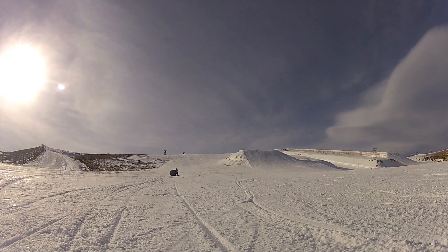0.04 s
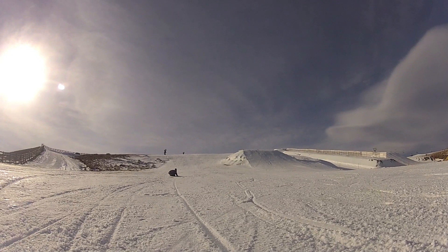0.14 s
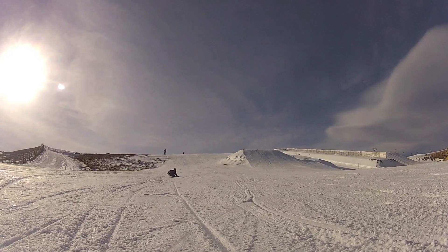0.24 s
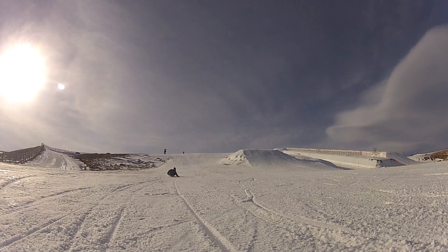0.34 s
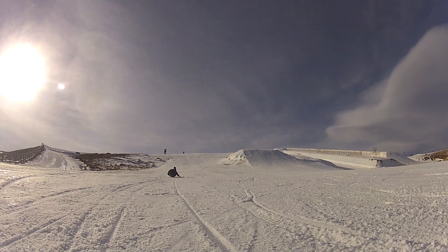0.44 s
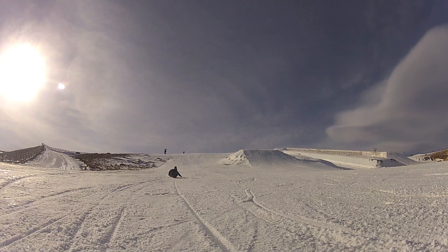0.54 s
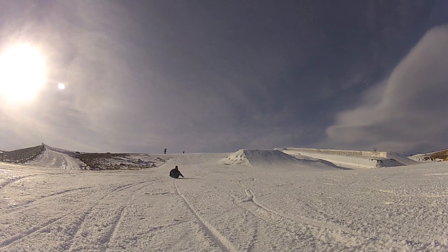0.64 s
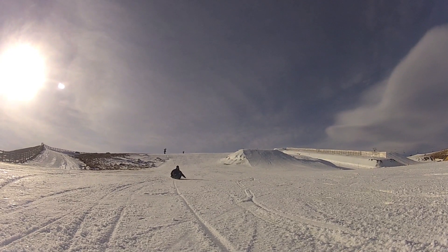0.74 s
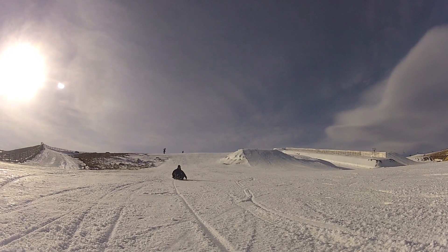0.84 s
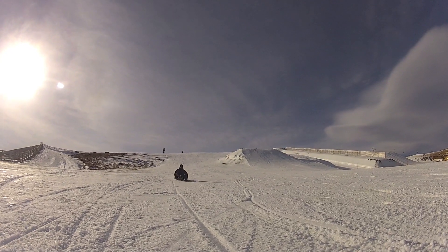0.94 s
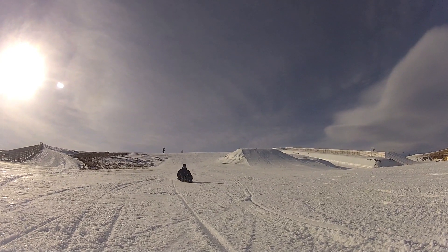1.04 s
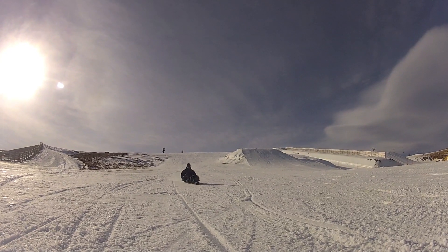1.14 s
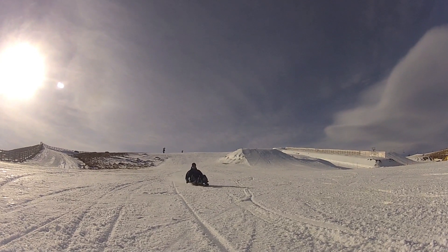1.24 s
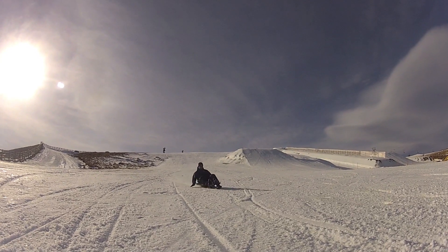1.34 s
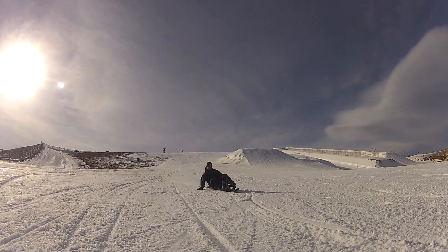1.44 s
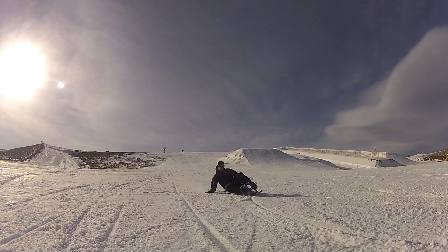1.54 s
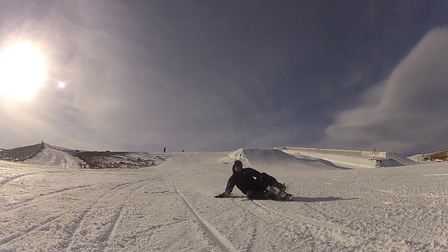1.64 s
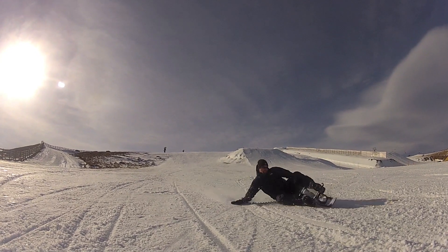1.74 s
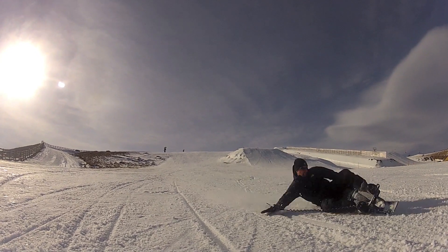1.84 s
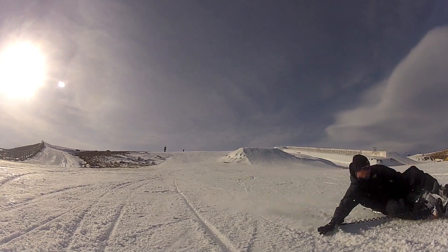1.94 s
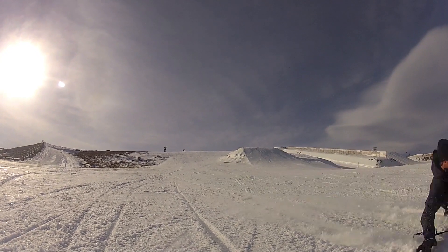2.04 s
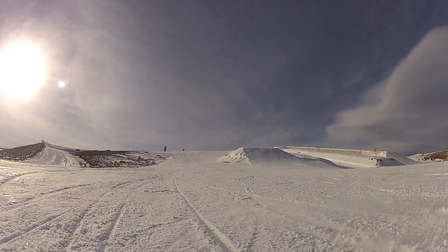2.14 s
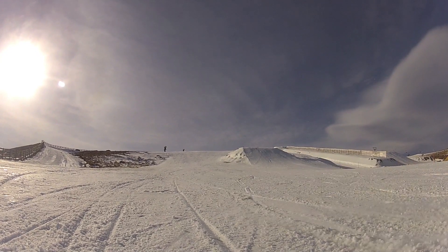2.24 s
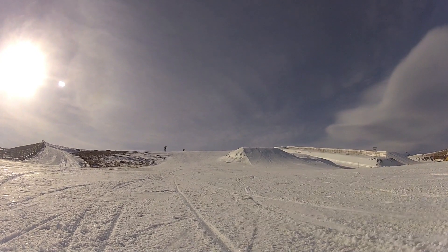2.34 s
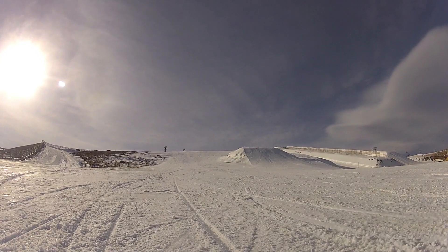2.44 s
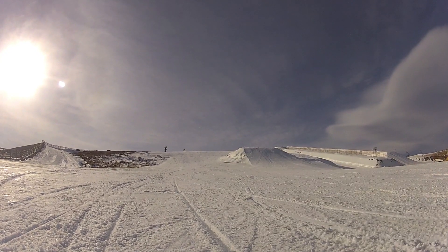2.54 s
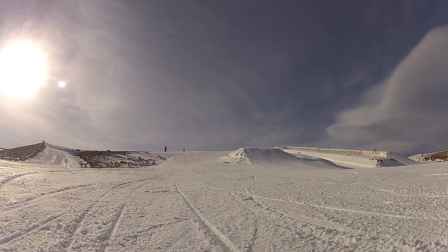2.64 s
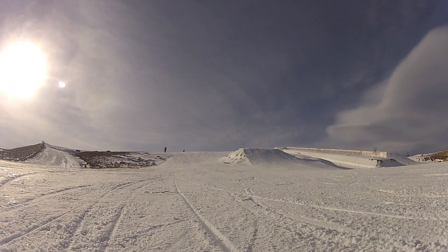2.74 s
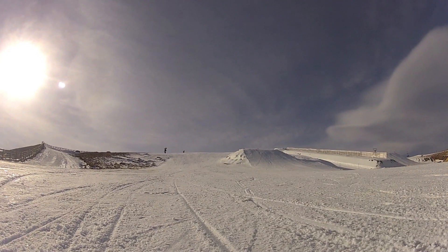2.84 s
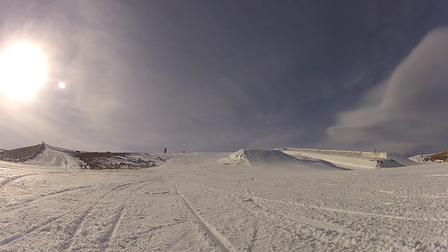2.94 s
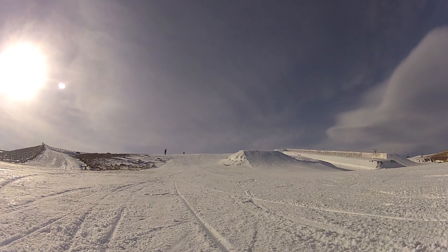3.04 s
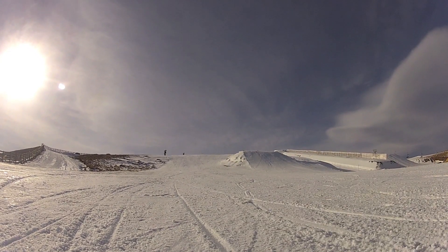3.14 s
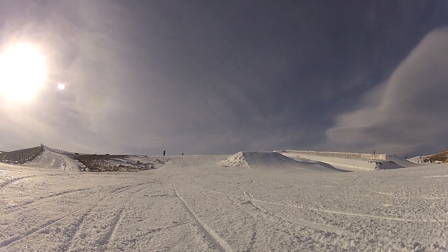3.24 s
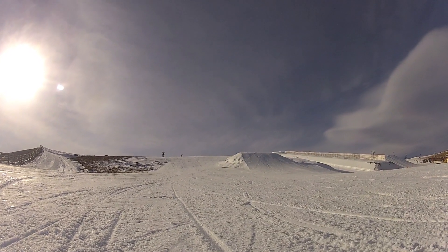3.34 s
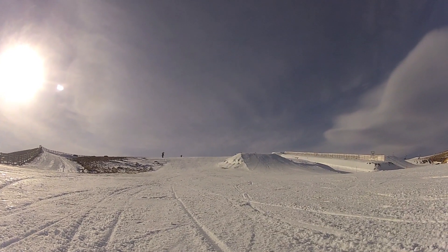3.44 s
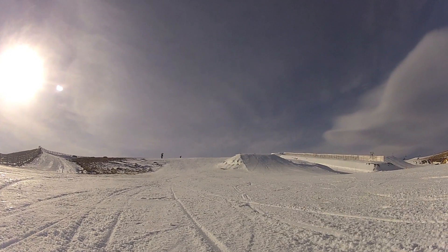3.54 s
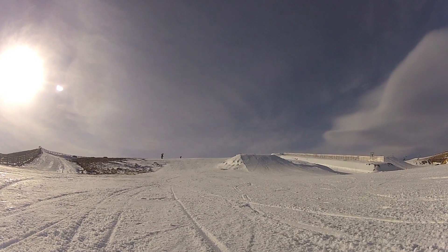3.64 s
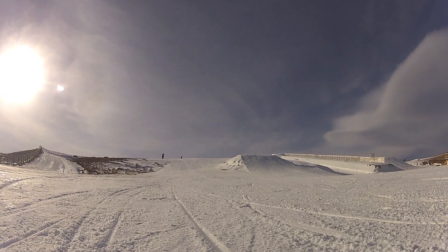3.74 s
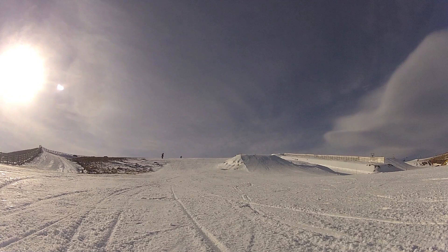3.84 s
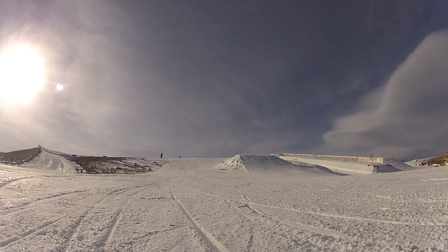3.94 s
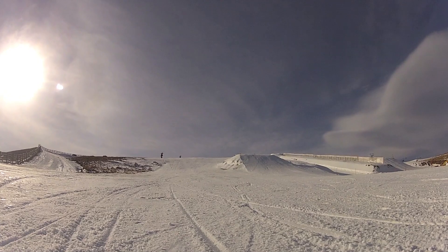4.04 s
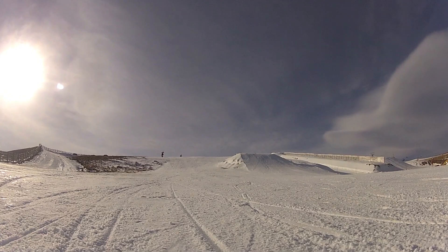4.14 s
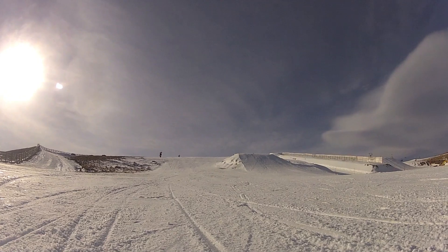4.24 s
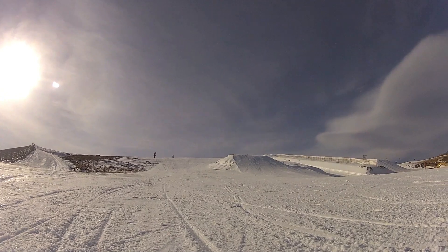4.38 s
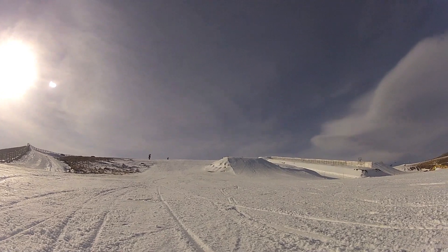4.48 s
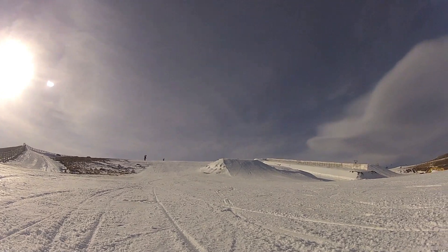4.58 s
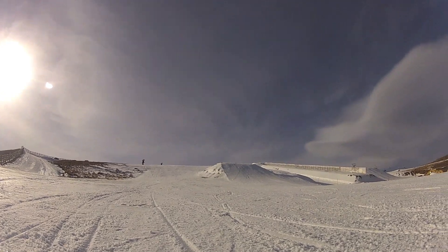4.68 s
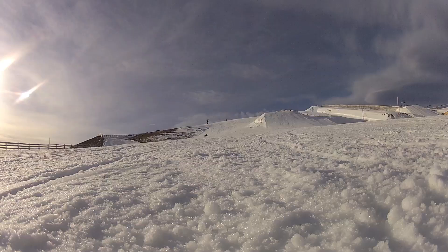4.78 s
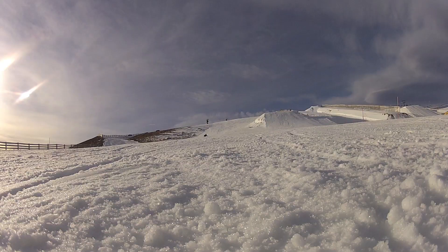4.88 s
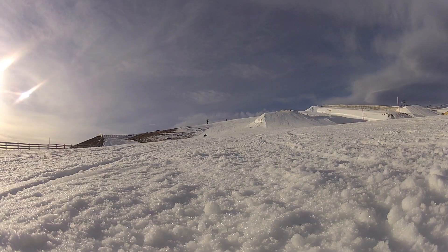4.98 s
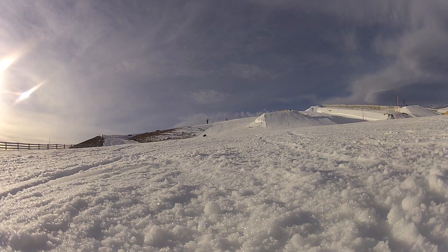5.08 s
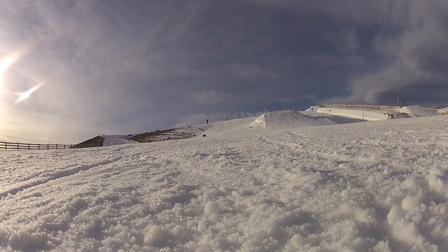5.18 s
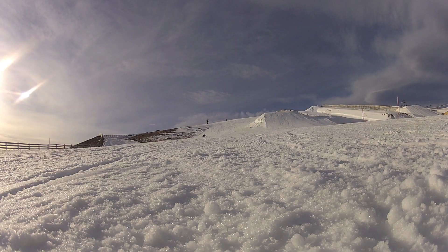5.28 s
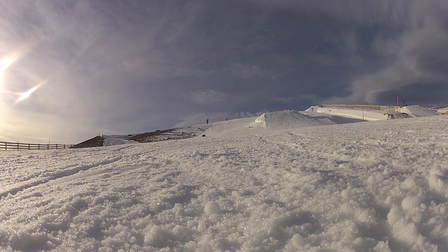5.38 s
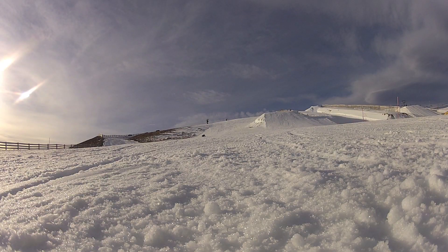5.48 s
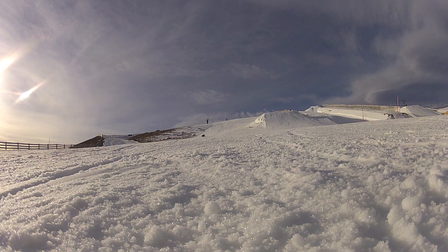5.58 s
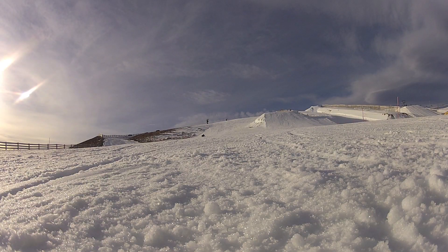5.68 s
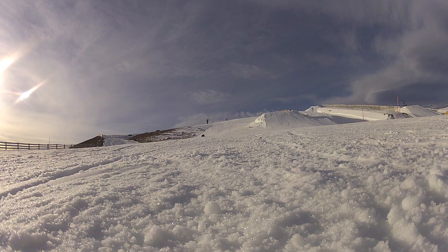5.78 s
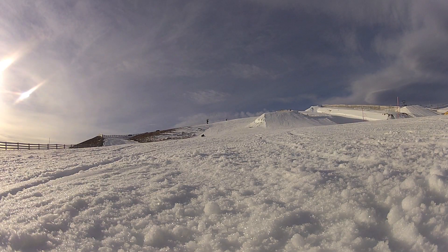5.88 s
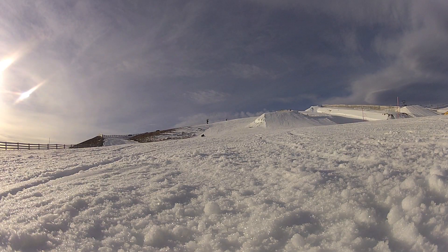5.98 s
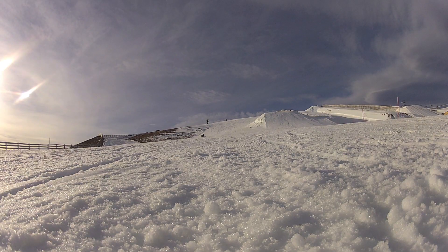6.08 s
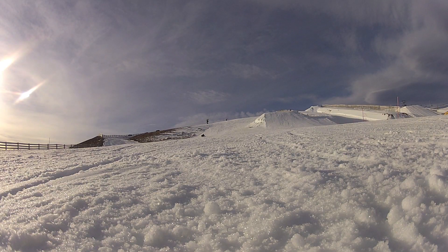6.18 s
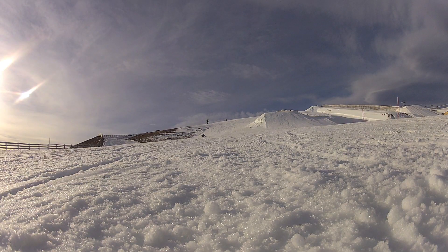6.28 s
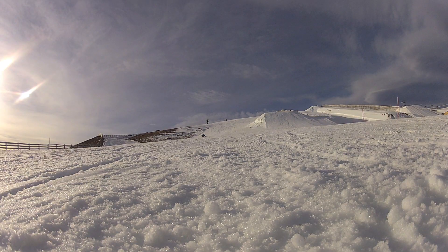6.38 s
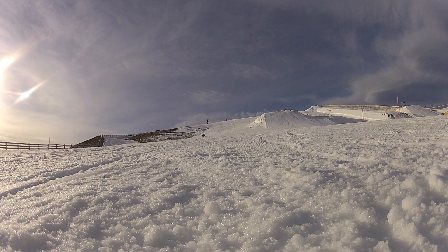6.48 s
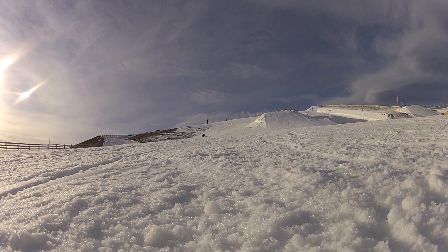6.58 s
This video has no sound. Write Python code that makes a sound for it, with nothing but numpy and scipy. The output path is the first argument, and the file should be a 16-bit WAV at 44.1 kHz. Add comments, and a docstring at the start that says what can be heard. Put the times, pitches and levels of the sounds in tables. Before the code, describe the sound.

A sled swishes by over snow and fades, then the camera tips over with a brief crunch and a sharp knock.

```python
"""Sled pass and camera tumble

A sled scrapes down packed snow, passes close to a cased camera lying on the slope and sprays it with
crumbs that ping on the case. Light wind rumbles underneath. The camera then tips over in the crunching
snow and lands with a hard knock that overloads the microphone, so the recorder ducks for a moment."""
import sys
import numpy as np
from scipy import signal
from scipy.fft import rfft, irfft
from scipy.io import wavfile
from scipy.ndimage import uniform_filter1d

SR = 44100
rng = np.random.default_rng(int(sys.argv[2]) if len(sys.argv) > 2 else 0)


def file_out(sig):
    """Save sig as 16-bit WAV at sys.argv[1]."""
    # one column per channel
    cols = np.atleast_2d(sig).T
    # limit, then scale
    lim = np.clip(cols, -1, 1)
    pcm = np.round(lim * 32767).astype(np.int16)
    wavfile.write(sys.argv[1], SR, pcm)


N = 291711
TIME = np.arange(N) / SR
FREQS = np.fft.rfftfreq(8192, 1 / SR) + 1e-3

# Wind on the case. Each row: time in seconds, level in dB.
WIND_LEVEL = [(0, -52), (.8, -55), (2.8, -54.5), (4, -58.5), (4.95, -63.5), (5.6, -62), (6.6, -65)]
# Tone of the wind and of the microphone's hiss. Each row: frequency in Hz, gain in dB.
WIND_EQ = [(15, -8), (28, -2.5), (50, -1), (105, 1.5), (170, -2.5), (290, -4), (370, -15), (480, -22.5),
           (800, -29), (2000, -46)]
HISS_EQ = [(100, 5.5), (380, 12.5), (500, 9), (700, 4), (1200, 1), (2200, -1), (4800, -6), (5600, -11.5),
           (6030, -16), (6500, -12), (7300, -9), (11000, -16), (13000, -17.5), (15000, -17)]
# Where the sled is. Each row: time in seconds, bearing (0 ahead, 1 alongside, 2 behind).
SLED_BEARING = [(0, 0), (1.35, 0.16), (1.6, 0.51), (1.8, 0.68), (2.0, 1.07), (2.22, 1.76), (2.36, 2)]
# Case resonances for sound from each bearing. Each row: centre in Hz, width in Hz, gain in dB.
AHEAD_MODES = [(654, 460, -6.5), (1380, 126, -4.5), (2016, 245, 1.5), (2600, 420, -5), (3060, 120, 0.5),
               (3740, 230, 3.5), (4150, 330, -4), (4910, 500, -12), (5350, 470, -4), (6600, 850, -6.5),
               (7830, 410, -12), (8230, 216, -3), (8920, 200, -10), (9750, 500, -16), (12200, 550, -21),
               (14400, 400, -16), (14960, 340, -19.5)]
ALONGSIDE_MODES = [(670, 410, -5.5), (1346, 170, -4), (1824, 240, 3), (2270, 270, -10), (3160, 290, -4.5),
                   (3630, 430, -5.5), (4540, 470, -13.5), (5040, 480, -20), (7000, 650, -13.5),
                   (8140, 500, -11.5), (8410, 380, -10), (8900, 260, -14), (10210, 370, -16),
                   (13700, 400, -16), (14500, 330, -11.5), (15200, 250, -25)]
BEHIND_MODES = [(450.1, 310, -1.5), (950, 350, -2.5), (1958, 120, -2.5), (2360, 220, -5.5),
                (3200, 330, -6.5), (3726, 190, -1), (5100, 300, -16.5), (6940, 260, -17), (8330, 260, -7),
                (9610, 200, -15), (10000, 260, -18), (10830, 200, -21.5), (12900, 310, -21.5),
                (14000, 260, -18.5), (14450, 250, -14.5)]
# The runners bite sideways. Each row: start and release in seconds, close-up level in dB.
RUNNER_CARVES = [(-.1, .52, -43), (.45, .76, -48), (.95, 1.1, -46.5), (1.35, 2.44, -44),
                 (2.58, 2.79, -51.5)]
# Resonances that glide during the pass. Each row: first and last pitch in Hz, width in Hz, gain in dB.
GLIDING_MODES = [(2132, 2540, 250, -4.5), (3960, 3400, 260, -7.5), (4540, 5400, 280, -15.5),
                 (10030, 9450, 290, -14.5)]
# Tone of the drumming hull. Each row: frequency in Hz, gain in dB.
HULL_EQ = [(25, -41), (60, -19.5), (110, -2.5), (170, -2), (240, 3.5), (330, -2), (450, -11.5),
           (800, -19.5), (1400, -36.5), (4000, -59.5)]
# The hull rides over humps. Each row: start and release in seconds, level in dB.
HULL_HUMPS = [(1.72, 1.79, -59), (1.86, 1.92, -46), (2.04, 2.15, -45), (2.22, 2.26, -45.5)]
# The runners hit icy ridges. Each row: time in seconds, relative level in dB.
RIDGE_HITS = [(.172, -37.5), (.327, -40.5), (.776, -44), (.997, -39), (1.27, -46.5), (1.356, -34.5),
              (1.383, -39), (1.496, -33), (2.219, -41), (2.359, -35), (2.455, -43), (2.464, -35.5)]
# Showers of snow dust. Each row: start and release in seconds, level in dB.
DUST_SHOWERS = [(2.05, 2.28, -56.5), (2.65, 2.95, -67), (3.1, 3.27, -67.5)]
# Tone of the dust. Each row: frequency in Hz, gain in dB.
DUST_EQ = [(200, -10), (500, -7.5), (1100, -6), (1500, -2), (2000, 4.5), (2450, 0), (2900, -8),
           (3700, -6.5), (5000, -18.5), (7500, -22), (8400, -16), (9700, -10), (11000, -24), (13000, -19),
           (14400, -15), (15500, -21)]
# Crumbs hit the case and clods land nearby. Each row: time in seconds, peak in dB.
CRUMB_HITS = [(2.109, -34), (2.116, -25), (2.131, -26.5), (2.168, -39), (2.180, -23), (2.185, -26.5),
              (2.189, -49), (2.602, -43.5), (2.708, -42.5), (3.192, -52)]
CLOD_HITS = [(2.222, -36.5), (2.384, -33.5), (2.421, -40.5), (2.454, -42.5), (2.541, -42), (2.608, -51),
             (2.722, -46.5)]
# The ping of the case and the plop of a clod. Each row: centre in Hz, width in Hz, gain in dB.
PING_MODES = [(1050, 210, -19), (2030, 160, -5), (2417, 210, 7), (3400, 670, -17), (5200, 350, -25),
              (6750, 350, -21), (9600, 260, -6), (14350, 390, -10.5)]
PLOP_MODES = [(980, 500, -6), (1900, 200, -7), (9700, 500, -32), (11000, 300, -21), (12700, 300, -26)]
# The case thuds on the snow; the last two rows are the landing knock's low body.
# Each row: time in seconds, peak in dB, pitch in Hz.
LOW_THUDS = [(3.808, -39, 125), (4.549, -40, 160), (4.614, -29, 105), (4.633, -35, 95), (4.742, -24, 170),
             (4.765, -19, 102), (4.7625, -13, 270)]
# Tone of the breaking crust and of the rolling case. Each row: frequency in Hz, gain in dB.
CRUST_EQ = [(200, 0), (600, -1.5), (1200, -1), (1550, -2.5), (2000, 3), (2800, -11), (3700, -10.5),
            (5000, -22.5), (6000, -23.5), (8300, -20), (10000, -13), (11500, -22), (13000, -21),
            (14300, -13), (15500, -21)]
ROLL_EQ = [(20, -7.5), (60, -1.5), (110, 3), (170, 1.5), (300, -6.5), (400, -18.5), (800, -30.5),
           (2000, -48)]
# Larger pieces of crust snap under the camera. Each row: time in seconds, peak in dB.
CRUST_SNAPS = [(4.617, -52), (4.656, -38), (4.689, -43.5), (4.718, -37), (4.736, -31.5), (4.745, -33),
               (4.782, -40)]
# The case chatters against its mount. Each row: time in seconds, relative level in dB.
MOUNT_HITS = [(4.76215, -8), (4.76316, 1.7), (4.76392, 0), (4.76483, 2.5), (4.76566, -.6)]
# The ring of that knock. Each row: centre in Hz, width in Hz, gain in dB.
MOUNT_MODES = [(280, 240, 5.5), (790, 360, -8), (1150, 560, -1), (1746, 420, -7), (2608, 700, -14),
               (3550, 800, -9), (4875, 210, -22.5), (8300, 1000, -16.5), (10660, 380, -15.5),
               (13800, 900, -20)]
# Narrow bands where the microphone is dull. Each row: centre in Hz, width in Hz, gain in dB.
MIC_DIPS = [(6020, 780, -7), (12300, 250, -18)]


def undb(db):
    """Decibels to gain."""
    return 10 ** (np.asarray(db) / 20)


def curve(rows):
    """Automation line through (seconds, value) points."""
    return np.interp(TIME, *np.transpose(rows))


def unit(x):
    """Scale to rms 1."""
    return x / np.sqrt(np.mean(x ** 2))


def response(gain):
    """Causal impulse response with the given gain at FREQS."""
    cepstrum = irfft(np.log(gain + 1e-9))
    half = len(cepstrum) // 2
    cepstrum[1:half] *= 2
    cepstrum[half + 1:] = 0
    return irfft(np.exp(rfft(cepstrum)))[:half]


def colour(points):
    """Impulse response of a (Hz, dB) EQ curve."""
    hz, db = np.transpose(points)
    return response(undb(np.interp(np.log(FREQS), np.log(hz), db)))


def resonances(modes, skirt_db=-19):
    """Impulse response of steep resonant peaks with weak, wide skirts."""
    power = 0
    for hz, width, db in modes:
        detune = ((FREQS ** 2 - hz ** 2) / (FREQS * width)) ** 2
        peak = 1 / (1 + detune / 2) ** 2
        skirt = undb(skirt_db) ** 2 / (1 + detune / 10)
        power += undb(db) ** 2 * (peak + skirt)
    return response(np.sqrt(power))


def through(x, ring):
    """Play x through an impulse response."""
    return signal.fftconvolve(x, ring)[:N]


def rolloff(x, hz, kind):
    """Two-pole "high" or "low" pass."""
    return signal.sosfilt(signal.butter(2, hz, kind, fs=SR, output="sos"), x)


def noise(eq):
    """Smooth noise shaped by an EQ curve, at rms 1."""
    return unit(through(rng.standard_normal(N), colour(eq)))


def wobble(rate):
    """Random modulation that glides to a new value rate times a second, at rms 1."""
    hold = max(int(SR / rate), 1)
    steps = np.repeat(rng.standard_normal(N // hold + 1), hold)
    return unit(uniform_filter1d(steps, hold)[:N])


def grains(rate, spread_db):
    """Snow crystals breaking: about rate clicks a second, most small, a few large."""
    breaks = rng.random(N) < rate / SR
    polarity = rng.choice([-1, 1], N)
    size = undb(spread_db * np.minimum(rng.exponential(size=N), 5))
    return unit(breaks * polarity * size)


def bursts(events, ring, decay_s):
    """A short crumbling push into an impulse response for each (seconds, peak dB) event."""
    out, age = np.zeros(N + len(ring)), TIME[:len(ring)]
    for start, db in events:
        push = rng.standard_normal(len(age)) * np.exp(-age / decay_s)
        hit = signal.fftconvolve(push, ring)[:len(age)]
        out[int(start * SR):][:len(age)] += undb(db) * hit / np.abs(hit).max()
    return out[:N]


def swell(start, end, attack_s, release_s):
    """Envelope that rises from start and dies away after end."""
    return np.clip((TIME - start) / attack_s, 0, 1) * np.exp(-np.maximum(TIME - end, 0) / release_s)


def swells(rows, attack_s, release_s):
    """Joint envelope of (start, end, dB) swells whose powers add."""
    return np.sqrt(sum((undb(db) * swell(start, end, attack_s, release_s)) ** 2
                       for start, end, db in rows))


def nearness(passes_s=2.037, speed_m_s=7.0, closest_m=1.6):
    """Distance gain of the sled on its straight run, 1 at the closest point."""
    return closest_m / np.hypot(closest_m, speed_m_s * (TIME - passes_s))


def runner_level(glide_db=-53, hidden_from_s=2.6, fade_db_per_s=12.5):
    """The runners' fader: a flat glide plus carves, softened by distance, then hidden by the slope."""
    bite = np.hypot(undb(glide_db), swells(RUNNER_CARVES, attack_s=0.25, release_s=0.065))
    shade = undb(-fade_db_per_s * np.maximum(TIME - hidden_from_s, 0))
    return bite * nearness() * shade


def air(flutter_db=1.9, hiss_db=-66.5):
    """Wind buffets the case over a bed of smooth microphone hiss."""
    wind = noise(WIND_EQ) * undb(curve(WIND_LEVEL) + flutter_db * wobble(14))
    return wind + undb(hiss_db) * noise(HISS_EQ)


def scrape(judder_db=1.77, surge_db=0.62, abreast_db=-1):
    """Runners shear the crust in uneven slips; the case colours the rush by the sled's bearing."""
    rub, bearing, rush = grains(7000, spread_db=1.5), curve(SLED_BEARING), 0
    for direction, modes in enumerate([AHEAD_MODES, ALONGSIDE_MODES, BEHIND_MODES]):
        crossfade = np.clip(1 - np.abs(bearing - direction), 0, 1)
        rush += crossfade * unit(through(rub, resonances(modes)))
    abreast = np.sqrt(np.clip(1 - np.abs(bearing - 1), 0, 1))
    slips = undb(judder_db * wobble(110) + surge_db * wobble(25))
    return (rush * undb(abreast_db * abreast) + abreast * pass_sweep()) * runner_level() * slips


def pass_sweep(start_s=1.5, end_s=2.32):
    """Narrow, grainy rings in the scrape slide in pitch as the sled goes by."""
    progress, out = np.interp(TIME, [start_s, end_s], [0, 1]), 0
    for first_hz, last_hz, width, db in GLIDING_MODES:
        rub = grains(3000, spread_db=2.5) + 1j * grains(2700, spread_db=2.5)
        band = rolloff(rub, width / 2, "low")
        cycles = np.cumsum(first_hz + (last_hz - first_hz) * progress) / SR
        out += undb(db) * unit(np.real(band * np.exp(2j * np.pi * cycles)))  # shift the band up to pitch
    return out


def grit(gain_db=-12):
    """Bits of ice snap under the front of the runners, heard while the sled faces the camera."""
    ticks = through(grains(110, spread_db=1), resonances(AHEAD_MODES))
    facing = np.clip(1 - curve(SLED_BEARING), 0, 1)
    return undb(gain_db) * unit(rolloff(ticks, 3200, "high")) * runner_level() * facing


def hull(closest_db=-47, falloff=1.8, rough_db=0.5):
    """The hull drums on the ridges, harder over humps, and fades fast with distance."""
    jolts = grains(900, spread_db=3.1) * undb(rough_db * wobble(30))
    drum = unit(through(jolts, colour(HULL_EQ)))
    humps = swells(HULL_HUMPS, attack_s=0.012, release_s=0.023)
    return drum * np.hypot(undb(closest_db) * nearness() ** falloff, humps)


def ridge_cracks(gain_db=-4):
    """The runners crack brightly over icy ridges."""
    cracks = bursts(RIDGE_HITS, resonances(AHEAD_MODES), decay_s=0.0042)
    return undb(gain_db) * rolloff(cracks, 2500, "high")


def dust():
    """Fine snow patters on the slope and the case in the sled's wake."""
    patter = unit(through(grains(700, spread_db=2.9), colour(DUST_EQ)))
    return patter * swells(DUST_SHOWERS, attack_s=0.093, release_s=0.18)


def spray(start_s=2.105, end_s=2.155, attack_s=0.013, level_db=-43.5, ping_db=-1):
    """A sheet of snow off the runners rattles across the case; stragglers leave a tail of pings."""
    rattle = unit(through(grains(2500, spread_db=1.5), resonances(ALONGSIDE_MODES)))
    rattle *= swell(start_s, end_s, attack_s, release_s=0.0094)
    pings = unit(through(grains(400, spread_db=1.6), resonances(PING_MODES)))
    pings *= swell(start_s, end_s, attack_s, release_s=0.18)
    return undb(level_db) * (rattle + undb(ping_db) * pings)


def crumbs():
    """The largest thrown crumbs ping on the case."""
    return bursts(CRUMB_HITS, resonances(PING_MODES), decay_s=0.0028)


def clods():
    """Heavier clods plop down beside the camera."""
    return bursts(CLOD_HITS, resonances(PLOP_MODES), decay_s=0.0067)


def thuds(decay_cycles=0.62):
    """Low pulses, damped within a cycle or two: the case on the snow, then the landing knock's body."""
    out = 0
    for start, db, hz in LOW_THUDS:
        cycles = np.maximum(TIME - start, 0) * hz
        thud = np.sin(2 * np.pi * cycles) * np.sqrt(cycles) * np.exp(-cycles / decay_cycles)
        out -= undb(db) * thud / np.abs(thud).max()
    return out


def tipping(leans_s=4.33, lands_s=4.745, rests_s=4.8, crumble_db=1.2, creep_db=-79):
    """The crust crunches and snaps and the case rumbles, building as the camera falls ever faster."""
    crust = colour(CRUST_EQ)
    to_landing_s = np.maximum(lands_s - TIME, 0)
    crunch_db = -49 - 161 * to_landing_s  # the crunch rushes in late
    rumble_db = -47 - 32 * to_landing_s  # the rumble builds gently
    crumble = grains(2500, spread_db=2.6) * undb(crumble_db * wobble(180))
    crunch = unit(through(crumble, crust)) * (undb(creep_db) + undb(crunch_db))
    rumble = noise(ROLL_EQ) * undb(rumble_db)
    snaps = bursts(CRUST_SNAPS, crust, decay_s=0.0037)
    return (crunch + rumble) * swell(leans_s, rests_s, attack_s=0.062, release_s=0.012) + snaps


def knock(gain_db=4):
    """Hard contacts with the mount, about a millisecond apart, ring the damped case."""
    blows, ring = np.zeros(N), resonances(MOUNT_MODES)
    for start, db in MOUNT_HITS:
        blows[int(start * SR)] += undb(db)
    return undb(gain_db) * through(blows, ring / np.abs(ring).max())


def scene():
    """The mono mix at the microphone: sled and thrown snow, air, then the camera's fall."""
    sled_pass = scrape() + grit() + hull() + spray() + ridge_cracks() + crumbs() + clods() + dust()
    return (sled_pass + air() + thuds() + tipping() + knock())[None]


def overload_guard(x, threshold=0.5, lag_s=0.038, hold_s=0.069, release_s=0.021, depth_db=-32):
    """The first overload ducks the gain after a short lag; it holds, then eases back."""
    overload_s = np.min(TIME[np.abs(x) > threshold], initial=np.inf)
    since = TIME - overload_s - lag_s
    duck = (since > 0) * np.exp(-np.maximum(since - hold_s, 0) / release_s)
    return x * undb(depth_db * duck)


def record(dry, ceiling=0.93, top_hz=15300):
    """The microphone saturates and colours the sound, the guard ducks it, the top is cut."""
    x = ceiling * np.tanh(dry[0] / ceiling)
    for hz, width, db in MIC_DIPS:
        band = signal.lfilter(*signal.iirpeak(hz, hz / width, fs=SR), x)
        x = x - (1 - undb(db)) * band
    x = overload_guard(rolloff(x, 18, "high"))
    top_cut = signal.ellip(12, 0.2, 90, top_hz, fs=SR, output="sos")
    return signal.sosfilt(top_cut, x)[None]


dry = scene()
out = record(dry)
file_out(out)
```